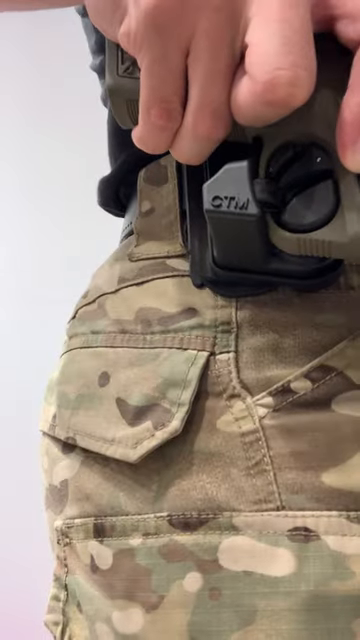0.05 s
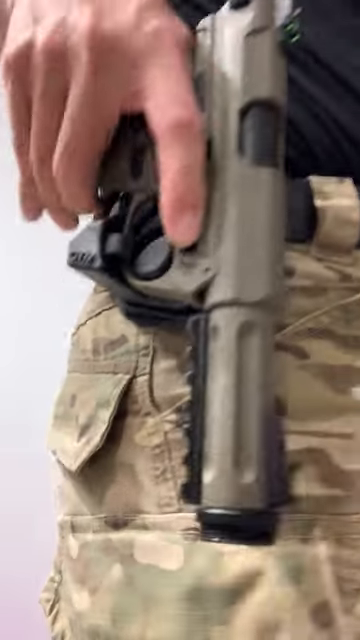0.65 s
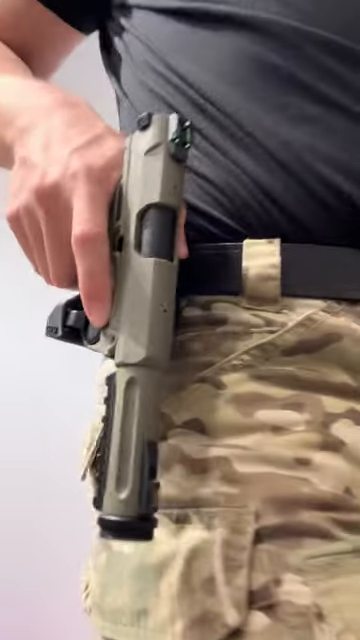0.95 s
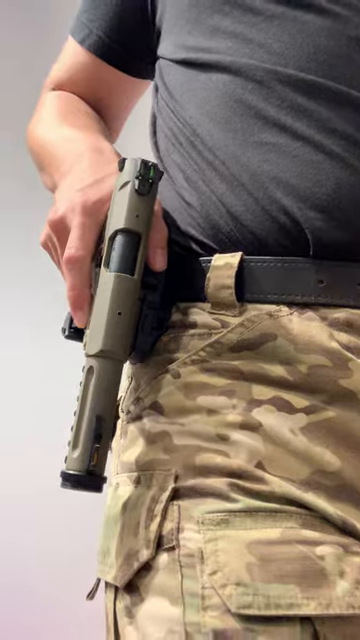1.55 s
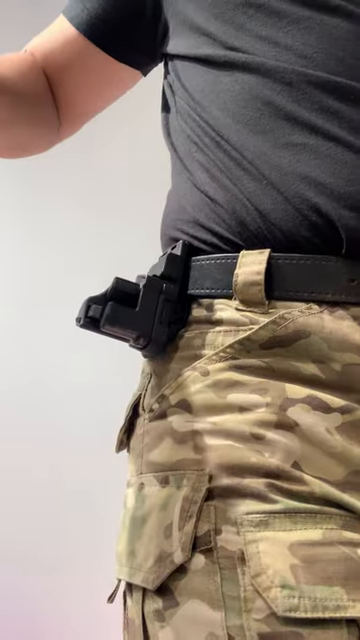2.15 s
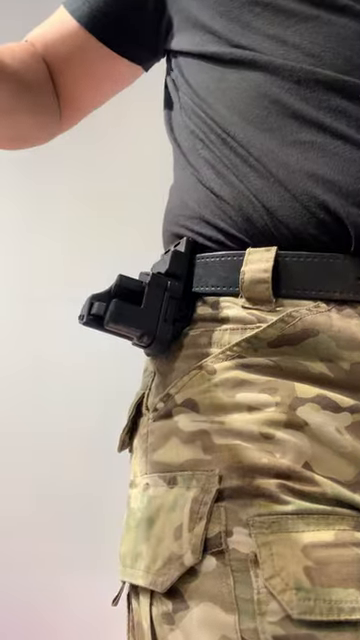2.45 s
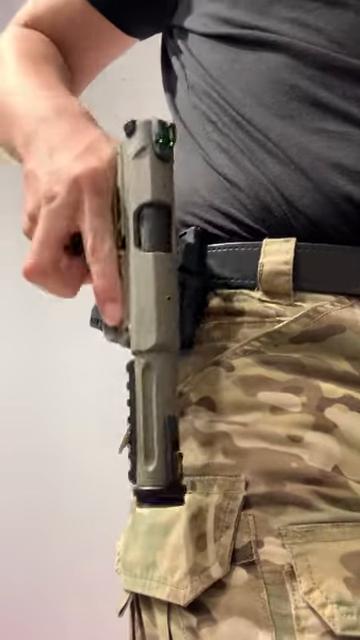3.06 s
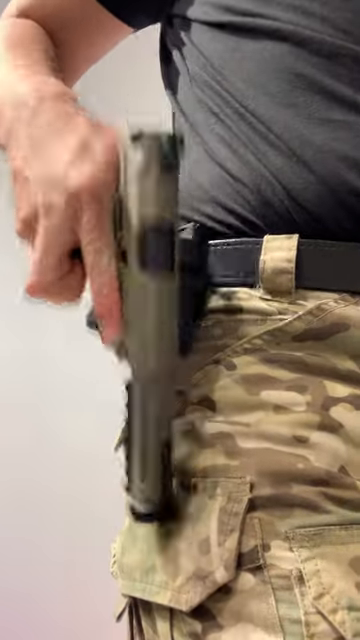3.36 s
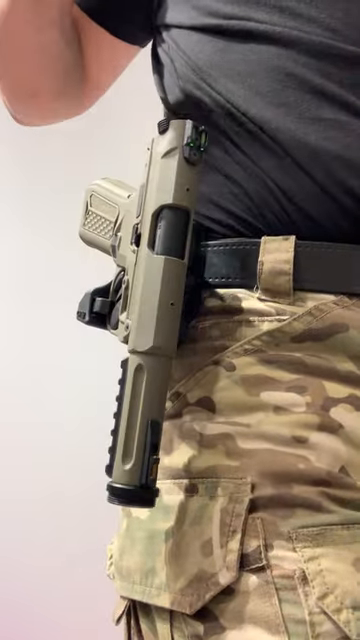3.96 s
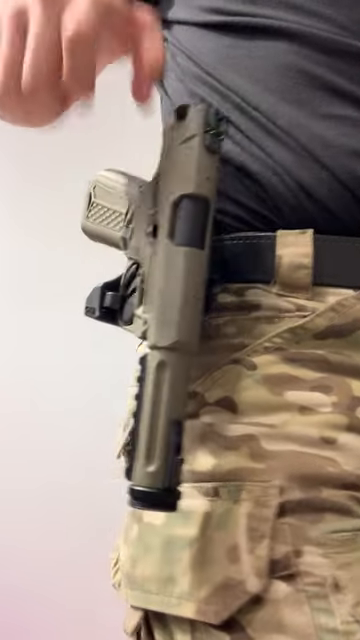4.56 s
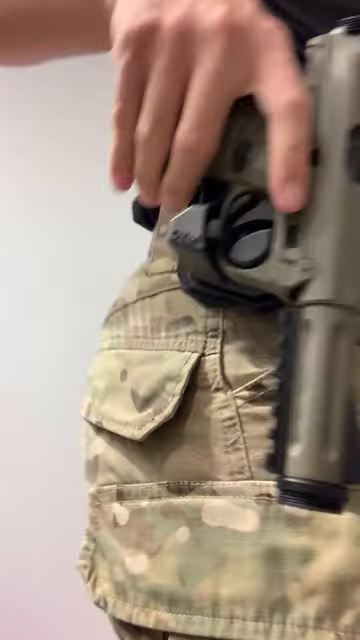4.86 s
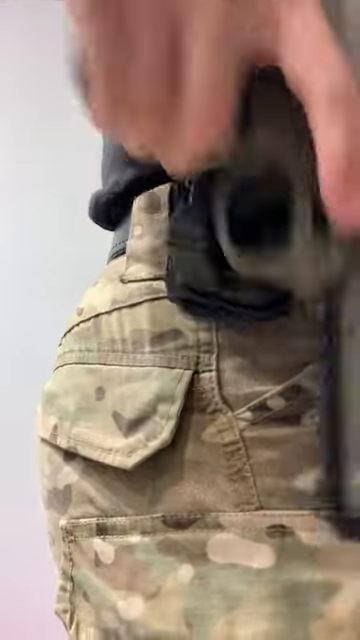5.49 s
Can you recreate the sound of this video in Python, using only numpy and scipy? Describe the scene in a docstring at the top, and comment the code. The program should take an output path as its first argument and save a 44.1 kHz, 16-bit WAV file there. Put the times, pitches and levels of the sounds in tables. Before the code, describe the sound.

A toy pistol is handled in a hard plastic belt holster, close to the microphone in a small, quiet room. For the first half second it rattles with light clicks and plastic scraping. Clothes rustle and a hand softly bumps the grip until about 1 second. At 1.8 seconds a short slide ends in a sharp snap, and a spring rings faintly. Light clicks and rubbing return from 2.6 seconds, leading to a scraping snap at 3.4 and the loudest snap at 3.5, slightly overloading the microphone and leaving a thin, faint ring. After a lull, a soft bump at 4.5 seconds leads into cloth rustle and a very faint squeak as the hand takes the grip. A click comes near 5.4 seconds, then the pistol is yanked out at 5.5 with a hard double snap and a low puff of air.

```python
"""A toy pistol is worked in a hard plastic belt holster, close to a microphone in a small room.
First it rattles in the catch, plastic sliding on plastic, while clothes rustle and the hand bumps the grip.
It is snapped home and a spring rings faintly; it is pulled free and snapped home again.
After a lull the hand takes the grip with a rustle and a faint squeak, then yanks the pistol out,
pushing a puff of air at the microphone. The hardest snaps overload the input."""
import sys
import numpy as np
from scipy import signal
from scipy.fft import rfft, irfft, next_fast_len
from scipy.io import wavfile
from scipy.ndimage import uniform_filter1d

SR = 44100
rng = np.random.default_rng(int(sys.argv[2]) if len(sys.argv) > 2 else 0)


def dump(signal):
    """Clip the signal to [-1, 1] and save it as 16-bit WAV at the path in sys.argv[1]."""
    limited = np.clip(np.atleast_2d(signal).T, -1, 1)
    pcm = np.round(limited * 32767).astype(np.int16)
    wavfile.write(sys.argv[1], SR, pcm)


N = 252693
TIME = np.arange(N) / SR
IMPACT_TIME = np.arange(8192) / SR
IMPACT_HZ = np.fft.rfftfreq(len(IMPACT_TIME), 1 / SR)

# Reverberation of the room: frequency_hz, t60_s
ROOM_DECAY = [(200, 0.11), (1000, 0.36), (4000, 0.33), (8000, 0.31), (15000, .22)]

# Relative spectral densities: frequency_hz, level_db
ROOM_SPECTRUM = [(12, -33.5), (20, 4), (27, -17), (86, -6.5), (123, -22), (154, -12), (234, -13.5),
                 (319, -20), (485, -22), (659, -23.5), (3070, -44), (4670, -47), (16000, -38.5)]  # the quiet room
PUFF_SPECTRUM = [(10, -9), (25, 10), (60, -29), (200, -65), (1000, -110)]  # air striking the microphone
CLOTH_SPECTRUM = [(410, -32), (700, 2.5), (1200, -5.5), (1840, -2.5), (2560, -7), (4200, -6),
                  (13300, -14.5), (16000, -21.5)]  # rustling clothes
SLIDE_SPECTRUM = [(240, -25.5), (600, -14), (1080, -2.5), (2100, -1), (3100, -5), (4500, -9.5),
                  (8000, -16.5), (11000, -23), (16000, -29)]  # sliding plastic
GRIP_SPECTRUM = [(150, -30), (470, -5.5), (660, 2.5), (820, -5), (1200, -23), (4000, -25), (16000, -86)]  # the grip under a soft blow
SHELL_SPECTRUM = [(100, -56), (400, -36.5), (750, -26), (1100, -13), (1450, -11), (2000, -8), (2900, -6),
                  (4200, -8.5), (5200, -7), (8900, -8.5), (10500, -16), (16000, -27)]  # pistol and holster under a hard blow

# Gestures that swell and fade: peak_s, level_db, rise_s, fall_s
AIR_PUFFS = [(5.555, -47, 0.056, 0.083)]  # air pushed by the drawn pistol
GRIP_SQUEAKS = [(4.85, -78.5, 0.46, .55)]  # the hand taking the grip
ARM_MOVES = [(.66, -58, 0.27, 0.17), (.95, -72, .5, 0.54), (2.62, -73.5, 0.24, 0.24),
             (4.72, -70.5, 0.45, 1), (4.91, -64, 0.093, 0.18)]  # sleeve and trousers moving
SLIDE_STROKES = [(.005, -43.5, .05, 0.073), (.3, -49.5, .06, 0.036), (.445, -51, 0.029, 0.099),
                 (1.655, -45, 0.017, .06), (1.767, -37, 0.037, 0.017), (2.915, -53, 0.055, 0.16),
                 (3.2, -56, 0.2, .3), (3.265, -46, 0.016, 0.059), (3.335, -41.5, .008, 0.061),
                 (3.362, -28, 0.022, 0.063), (3.51, -37, 0.017, 0.066), (5.38, -41, 0.014, 0.017),
                 (5.475, -50, 0.019, 0.039)]  # plastic pressed along plastic

# Soft bumps of the hand on grip and belt: start_s, level_db
HAND_BUMPS = [(0.59, -51), (0.624, -64.5), (0.663, -57), (0.774, -46), (0.843, -52), (4.494, -55.5)]
# Modes of the spring: start_s, pitch_hz, level_db, t60_s
SPRING_MODES = [(1.772, 651, -56, 1.3), (3.541, 3817, -57.5, 1.05), (3.541, 797, -69.5, 1.4)]
# Modes of the plastic parts: pitch_hz, level_db, t60_s
PLASTIC_MODES = [(1658, -1.5, 0.059), (2890, -1.5, 0.09), (3700, -12.5, 0.12), (4220, -4.5, 0.0083),
                 (6150, -4.5, 0.02), (8918, -5.5, 0.027)]
# Light contacts of pistol and holster, levels relative:
# start_s, level_db, knock_db, treble_db, part_hz, chatter_s
LIGHT_CONTACTS = [(0.0644, -33.5, -17.5, -19, 2070, .007), (0.079, -26.5, -21, -13, 2800, 0.0014),
                  (0.098, -35, -28, 15, 6260, .0013), (0.196, -36, -8.5, -30, 2530, 0.0051),
                  (0.208, -30, -19, -12, 2700, 0.0029), (0.2194, -16.5, -19.5, 1.5, 3530, 0.0021),
                  (0.2392, -28.5, -13.5, -45, 4140, 0.0072), (0.276, -21, -13, -4, 3840, 0.0015),
                  (0.298, -26, -15, -28, 2000, .003), (0.3075, -28, -14.5, -12, 2850, 0.0015),
                  (0.325, -36, -27.5, 18, 6350, 0.0022), (0.437, -30.5, -19.5, -35, 2390, .0023),
                  (0.4627, -13.5, -29, -2.5, 2920, 0.002), (0.503, -29.5, -18, -16, 1990, 0.0033),
                  (0.814, -39.5, -19, -2, 3050, 0.0013), (0.883, -42.5, -1.5, -18, 4500, 0.0023),
                  (1.633, -41.5, -9, -7.5, 2230, 0.0023), (1.65, -25.5, -13.5, -4.5, 1907, 0.0054),
                  (1.751, -24, -19.5, -11, 2870, 0.0079), (2.617, -53.5, -12.5, -1, 2006, 0.0052),
                  (2.672, -56, 2, -0.5, 3000, 0.0026), (2.7984, -50.5, 7, -19, 1650, 0.0026),
                  (2.873, -29.5, -0.5, -15, 1500, 0.0018), (2.955, -26, -3.5, -4, 1710, 0.002),
                  (3.147, -43, 2.5, -14.5, 1540, .0013), (3.2708, -23.5, -12, -8, 4400, 0.0011),
                  (3.413, -22.5, -21, -8, 5870, 0.0079), (3.5024, -20.5, 1, -15, 3180, 0.0024),
                  (5.214, -54.5, -10.5, -22, 4000, .003), (5.303, -47, -31.5, -7, 2110, 0.0024),
                  (5.349, -45.5, -7, 3, 3900, 0.0018), (5.3744, -16, -16.5, 2, 1930, 0.0023)]
# Hard blows of the catch, levels relative:
# start_s, level_db, knock_db, knock_hz, catch_hz, chatter_s, thud_db, rebound_db, rebound_hz
CATCH_BLOWS = [(1.7701, 0, -10, 1110, 3110, 0.0038, -31, -2, 4420),
               (3.3621, -1.5, -1.5, 1007, 2950, 0.0016, -39, -10.5, 4750),
               (3.5404, 8, -18.5, 1090, 3503, 0.0023, -66.5, -17, 3500),
               (5.4837, 2.5, -18, 1400, 7400, 0.0016, -41, -4, 4200),
               (5.5038, 5.5, -12, 1201, 4210, 0.0029, -52, -7, 8700)]


def amp(db):
    """Amplitude grows tenfold for every 20 dB."""
    return 10 ** (np.asarray(db) / 20)


def unit(x):
    """Normalisation to an rms of 1."""
    return x / np.sqrt(np.mean(x ** 2) + 1e-20)


def along(points, hz):
    """Interpolation on a logarithmic frequency axis."""
    frequencies, values = np.transpose(points)
    return np.interp(np.log(hz + 1), np.log(frequencies + 1), values)


def add(track, start_s, sound):
    """Superposition: a sound adds to the track from start_s on."""
    part = track[max(round(start_s * SR), 0):][:len(sound)]
    part += sound[:len(part)]


def filtered(x, gain):
    """Linear filtering multiplies the spectrum by a gain at each frequency."""
    size = next_fast_len(len(x) + 8192)
    return irfft(rfft(x, size) * gain(np.fft.rfftfreq(size, 1 / SR)), size)[:len(x)]


def coloured(noise, spectrum):
    """Spectral shaping: white noise takes on the given spectrum, at an rms of 1."""
    return unit(filtered(noise, lambda hz: amp(along(spectrum, hz))))


def causal(gain):
    """Causality: the minimum-phase response with this gain is silent before the blow."""
    cepstrum = irfft(np.log(np.maximum(gain, 1e-5)))
    half = len(cepstrum) // 2
    cepstrum[1:half] *= 2
    cepstrum[half + 1:] = 0
    return np.exp(rfft(cepstrum))


def resonance(hz, width_hz):
    """Frequency response of a damped oscillator, 1 at its centre."""
    damping = 1j * IMPACT_HZ * width_hz
    return damping / (hz ** 2 - IMPACT_HZ ** 2 + damping)


def grains(rate_hz, spread_db):
    """Random amplitude modulation makes white noise gritty."""
    knots = rng.standard_normal(int(N * rate_hz / SR) + 2)
    strength = amp(spread_db * np.interp(TIME * rate_hz, np.arange(len(knots)), knots))
    return rng.standard_normal(N) * strength


def swells(gestures, swell_db=20):
    """Incoherent gestures add in power; each gains swell_db over its rise and loses it over its fall."""
    power = np.zeros(N)
    for peak_s, level_db, rise_s, fall_s in gestures:
        away = np.maximum((peak_s - TIME) / rise_s, (TIME - peak_s) / fall_s)
        power += amp(level_db - swell_db * away) ** 2
    return np.sqrt(power)


def room(x, wet_db, build_s=0.0012):
    """Reverberation: echoes between near walls build up, then decay exponentially."""
    hz, t, noise = signal.stft(rng.standard_normal(SR // 2), SR, nperseg=256)
    fade = amp(-60 * t / along(ROOM_DECAY, hz)[:, None]) * (1 - np.exp(-t / build_s))
    tail = signal.istft(noise * fade, SR, nperseg=256)[1]
    response = amp(wet_db) * tail / np.linalg.norm(tail)
    response[0] += 1  # direct sound
    return signal.fftconvolve(x, response)


def room_noise(level_db=-66.5):
    """Stationary noise, strongest in the bass, is the floor of the quiet room."""
    return amp(level_db) * coloured(rng.standard_normal(N), ROOM_SPECTRUM)


def puff():
    """Air displaced by the last draw makes slow pressure fluctuations at the microphone."""
    return swells(AIR_PUFFS) * coloured(rng.standard_normal(N), PUFF_SPECTRUM)


def squeak(pitch_hz=1882, half_width_hz=45):
    """Light friction on the grip excites one narrow resonance."""
    tone = filtered(rng.standard_normal(N), lambda hz: 1 / (1 + ((hz - pitch_hz) / half_width_hz) ** 2))
    return swells(GRIP_SQUEAKS) * unit(tone)


def rubbing():
    """Friction noise follows the motion: gritty for sliding plastic, smoother for cloth."""
    slide = swells(SLIDE_STROKES) * coloured(grains(rate_hz=400, spread_db=4), SLIDE_SPECTRUM)
    cloth = swells(ARM_MOVES) * coloured(grains(rate_hz=230, spread_db=2), CLOTH_SPECTRUM)
    return room(amp(-0.5) * (slide + cloth), wet_db=-9.5)[:N]


def chatter(pressure, evenness=0.55):
    """Tiny random impacts under a pressure curve sum to a broadband spectrum, here partly smoothed."""
    burst = rfft(rng.standard_normal(len(IMPACT_TIME)) * pressure)
    ripple = np.sqrt(np.abs(uniform_filter1d(np.abs(burst) ** 2, size=70)))
    return burst / causal(ripple ** evenness)


def bumps(decay_s=0.013):
    """A soft impact of flesh excites only the lowest modes of the grip."""
    out = np.zeros(N)
    grip = causal(amp(along(GRIP_SPECTRUM, IMPACT_HZ)))
    for start_s, level_db in HAND_BUMPS:
        thud = irfft(chatter(np.exp(-IMPACT_TIME / decay_s)) * grip)
        add(out, start_s, amp(level_db - 1.5) * room(thud / np.abs(thud).max(), wet_db=-7))
    return out


def spring():
    """Damped free vibration: a spring in the pistol rings on after it is snapped home."""
    out = np.zeros(N)
    for start_s, pitch_hz, level_db, t60_s in SPRING_MODES:
        mode = np.sin(2 * np.pi * pitch_hz * TIME) * amp(-60 * TIME / t60_s)
        add(out, start_s, amp(level_db) * mode)
    return out


def contact(chatter_s, treble_db, part_hz, knock_hz, knock_db, part_db, part_loss, knock_width_hz):
    """Excitation and resonance: edges chatter, the shell and struck part ring, the hollow knocks."""
    pulse = np.exp(-(IMPACT_TIME / chatter_s * 1.3 - 0.4) ** 2)
    pressure = pulse + 0.12 * np.exp(-IMPACT_TIME / (1.4 * chatter_s))
    modes = sum(amp(db + rng.normal(0, 1.4)) * resonance(hz, np.log(1000) / np.pi / t60_s)
                for hz, db, t60_s in PLASTIC_MODES)
    modes += amp(part_db) * resonance(part_hz, part_loss * part_hz)
    edge = amp(treble_db / (1 + (6500 / (IMPACT_HZ + 1)) ** 4))  # sharper corners give more treble
    shell = causal(amp(along(SHELL_SPECTRUM, IMPACT_HZ)) * edge)
    crack = irfft(chatter(pressure) * shell * (1 + modes))
    hollow = irfft(chatter(pressure) * resonance(knock_hz, knock_width_hz) * resonance(knock_hz, 670))
    return np.sqrt(np.mean(pressure ** 2)) * (unit(crack) + amp(knock_db) * unit(hollow))


def clicks():
    """Light impacts excite the plastic and the holster's cavity as the pistol is rocked and guided."""
    out = np.zeros(N)
    for start_s, level_db, knock_db, treble_db, part_hz, chatter_s in LIGHT_CONTACTS:
        knock_hz = rng.normal(1130, 40)
        tick = contact(chatter_s, treble_db, part_hz, knock_hz, knock_db + 2.5,
                       part_db=5.5, part_loss=0.054, knock_width_hz=350)
        add(out, start_s, amp(level_db - 9.5) * room(tick, wet_db=-9.5))
    return out


def snaps(rebound_delay_s=0.0036, rebound_chatter_s=0.0039, first_treble_db=5, push_s=0.00049):
    """Impact and elastic rebound: the catch shuts or lets go, and the holster thuds against the hip."""
    out = np.zeros(N)
    thud = IMPACT_TIME / push_s * np.exp(1 - IMPACT_TIME / push_s)
    for (start_s, level_db, knock_db, knock_hz, catch_hz, chatter_s,
         thud_db, rebound_db, rebound_hz) in CATCH_BLOWS:
        first = (start_s, level_db, first_treble_db, chatter_s, catch_hz)
        rebound = (start_s + rebound_delay_s, level_db + rebound_db, 0, rebound_chatter_s, rebound_hz)
        for blow_s, blow_db, treble_db, length_s, part_hz in (first, rebound):
            blow = contact(length_s, treble_db, part_hz, knock_hz, knock_db - 3,
                           part_db=4.5, part_loss=0.15, knock_width_hz=80)
            add(out, blow_s, amp(blow_db - 10) * room(blow, wet_db=-7.5))
        add(out, start_s, amp(thud_db) * thud)
    return out


def scene():
    """Superposition: the pressures of all sources add in one channel."""
    background = room_noise()
    handling = clicks() + snaps() + spring() + bumps() + rubbing() + squeak() + puff()
    return (background + handling)[None]


def record(dry, hardness=5, top_hz=16000):
    """Saturation rounds off peaks near full scale; a steep low-pass then limits the bandwidth."""
    clipped = dry[0] / (1 + np.abs(dry[0]) ** hardness) ** (1 / hardness)
    return filtered(clipped, lambda hz: 1 / np.sqrt(1 + (hz / top_hz) ** 160))[None]


dry = scene()
out = record(dry)
dump(out)
```